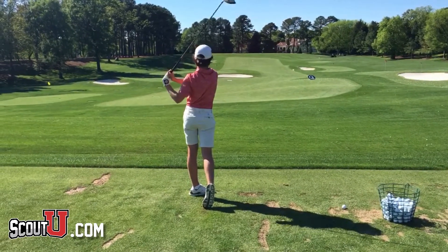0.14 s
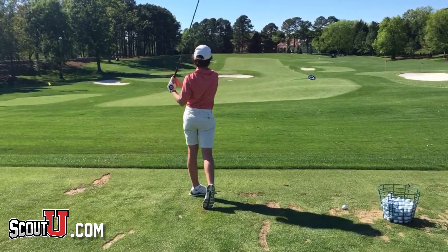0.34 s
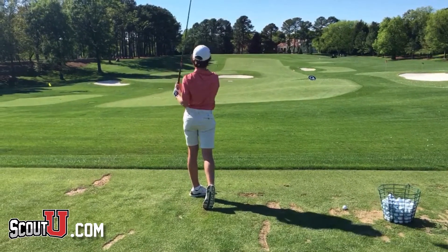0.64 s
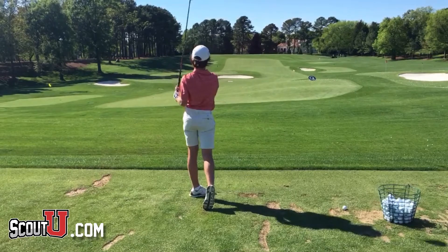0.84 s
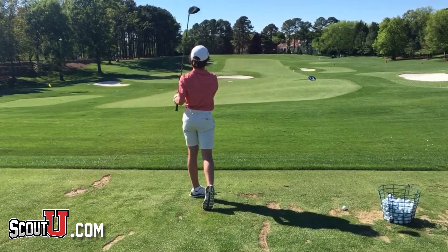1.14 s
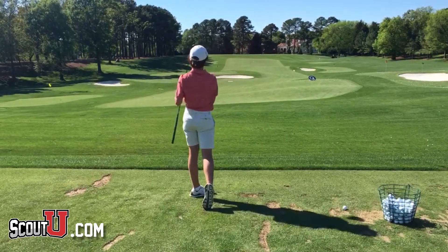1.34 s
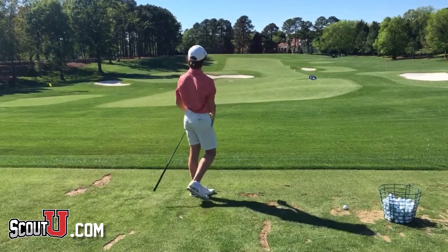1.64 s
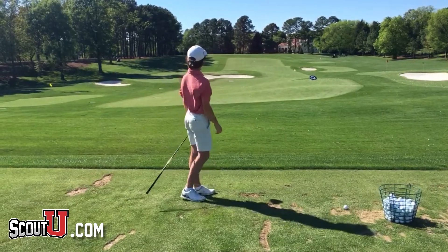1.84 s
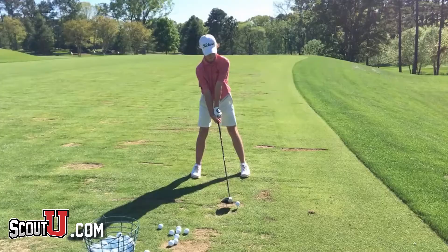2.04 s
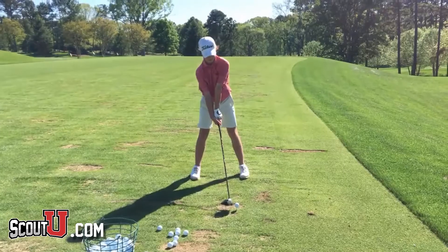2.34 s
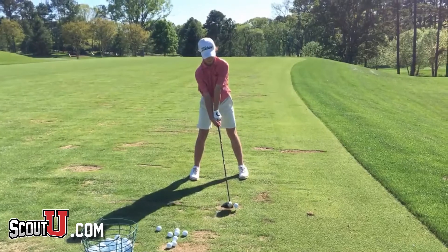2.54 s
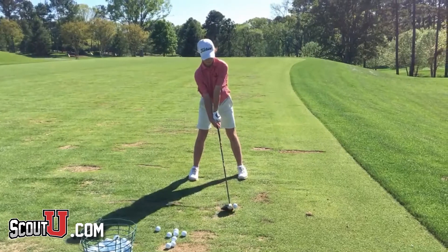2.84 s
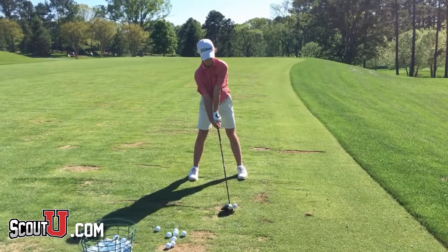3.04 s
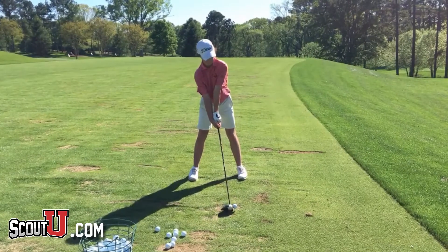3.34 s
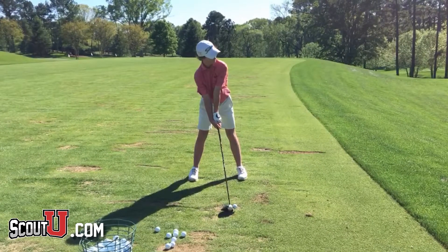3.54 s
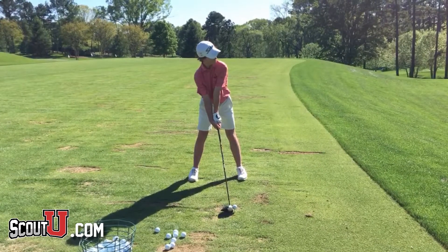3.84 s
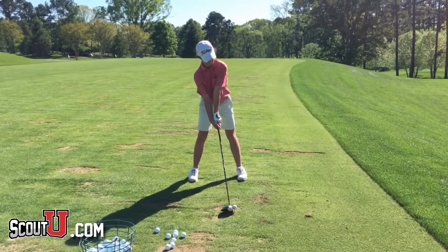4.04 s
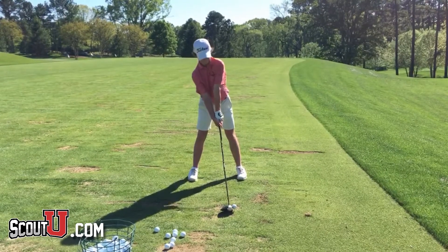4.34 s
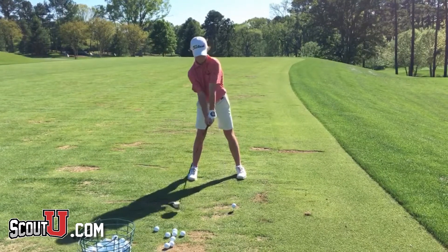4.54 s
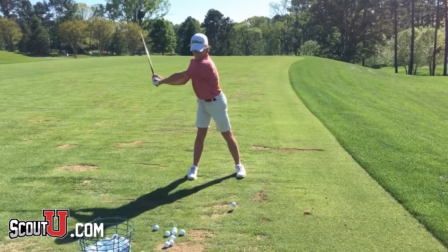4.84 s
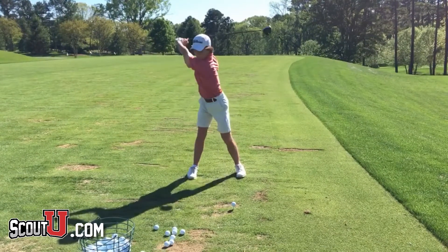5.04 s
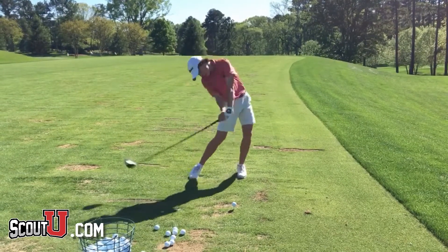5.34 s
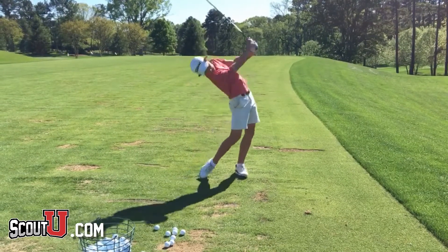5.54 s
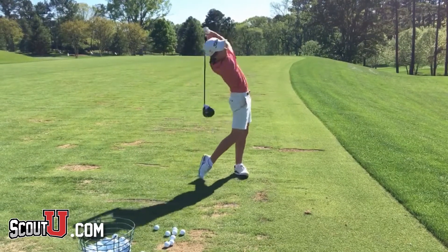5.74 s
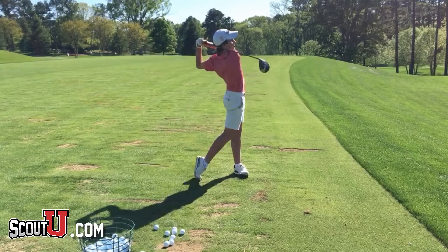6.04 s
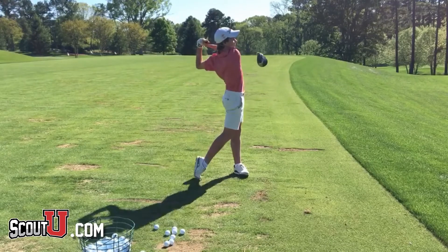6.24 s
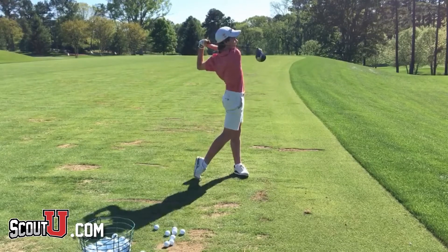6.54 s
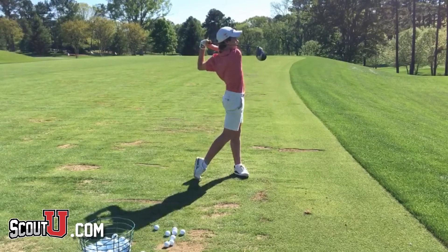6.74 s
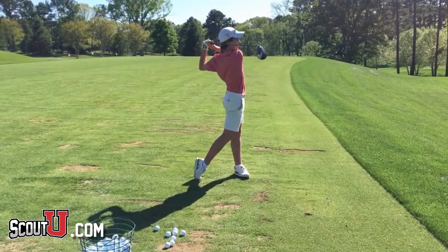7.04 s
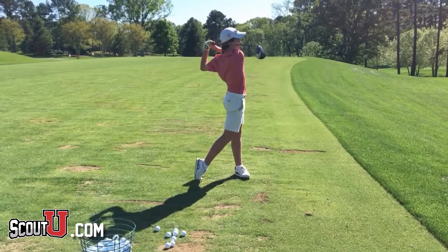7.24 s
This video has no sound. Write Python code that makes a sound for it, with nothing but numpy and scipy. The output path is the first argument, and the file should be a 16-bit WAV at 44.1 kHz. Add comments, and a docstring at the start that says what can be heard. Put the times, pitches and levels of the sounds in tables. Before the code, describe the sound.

An open-air golf practice range, heard in two views. From 0 to 2.1 seconds, a distant mower drones softly and low, swelling slightly around 1.6, with light wind and a whisper of treble rustle. Thin, faint bird whistles come between 0.25 and 1.1. Small knocks tick by, and at 0.83 another player's distant shot makes a short click, thud and tiny ring. Soft brushes and light ticks come near 2.0. A very brief silence follows at 2.1, then the mower is suddenly nearer: a fluttering low rumble with hollow roar, faint whine and hiss, and wind bumps near 2.4 and 4.4. At about 5.4 a driver swishes up rapidly, and at 5.53 it cracks the ball, loud, sharp and metallic, briefly ducking the background. Turf scatters the crack, and a weak tree-line echo swells and fades by about 6.4. Clothes rub faintly near 5.8. The mower rumbles on to the end at 7.4.

```python
"""A golf practice range in two views. First: a distant mower (blurred exhaust orders), light wind noise,
faint birds (wavering sines), and another player's shot among knocks (click, thud and ring).
After a brief silence the mower is nearer: orders, roar, whine and hiss. A driver swishes (speed-driven
vortex tones and noise) and cracks the ball: head modes ring in decaying sines, the limiter ducks,
turf scatters the crack and the tree line answers with a slow noise echo."""
import sys
import numpy as np
from scipy import signal
from scipy.fft import rfft, irfft, next_fast_len
from scipy.io import wavfile
from scipy.ndimage import uniform_filter1d, minimum_filter1d

SR = 44100
rng = np.random.default_rng(int(sys.argv[2]) if len(sys.argv) > 2 else 0)


def waveform_to_disk(signal):
    """Save audio, clipped to [-1, 1], as 16-bit WAV at the path in sys.argv[1]."""
    frames = np.transpose(np.atleast_2d(signal))
    scaled = np.clip(frames, -1, 1) * 32767
    samples = np.round(scaled).astype(np.int16)
    wavfile.write(sys.argv[1], SR, samples)


N = 325899
TIME = np.arange(N) / SR
FIRST_VIEW_END_S, SECOND_VIEW_START_S, FADE_S = 2.098, 2.1438, 0.0006
IMPACT_S = 5.5329


def from_db(db):
    """Decibels to gain."""
    return 10 ** (np.asarray(db) / 20)


def rms_one(x):
    """Scale to unit rms."""
    return x / np.sqrt(np.mean(x ** 2) + 1e-20)


def in_time(rows):
    """Interpolate each column of a time table at every sample."""
    time_s, *columns = np.transpose(rows)
    return [np.interp(TIME, time_s, column) for column in columns]


def shaped_noise(gain_at):
    """Unit-rms noise whose amplitude spectrum follows a function of frequency."""
    size = next_fast_len(N)
    hz = np.maximum(np.arange(size // 2 + 1) * SR / size, 1)
    spectrum = rfft(rng.standard_normal(size)) * gain_at(hz)
    return rms_one(irfft(spectrum, size)[:N])


def coloured(spectrum):
    """Unit-rms noise with a (Hz, dB) spectrum, falling away below its first point."""
    points_hz, points_db = np.transpose(spectrum)

    def gain_at(hz):
        """Interpolate over log frequency."""
        level_db = np.interp(np.log(hz), np.log(points_hz), points_db)
        return from_db(level_db) * np.minimum(hz / points_hz[0], 1) ** 2

    return shaped_noise(gain_at)


def drift(rate_hz, step=8):
    """Slow random signal of unit rms, low-passed at a rate on a coarse grid."""
    count = next_fast_len(N // step + 2)
    low_pass = 1 / (1 + (np.fft.rfftfreq(count, step / SR) / rate_hz) ** 2)
    slow = irfft(rfft(rng.standard_normal(count)) * low_pass, count)
    return np.interp(np.arange(N) / step, np.arange(count), rms_one(slow))


def phase_of(hz):
    """Running phase [rad] of a fixed or moving frequency."""
    return 2 * np.pi * np.cumsum(hz * np.ones(N)) / SR


def narrow_noise(phase, width_hz):
    """A tone blurred by two independent random amplitudes around a running phase."""
    return (drift(width_hz) * np.cos(phase) + drift(width_hz) * np.sin(phase)) / np.sqrt(2)


def dying(start_s, t60_s):
    """Envelope that jumps to 1 and decays by 60 dB in t60_s."""
    age_s = TIME - start_s
    return (age_s >= 0) * np.exp(-np.log(1000) * np.clip(age_s / t60_s, 0, 10))


def swell(centre_s, length_s):
    """Half-cosine rise and fall of height 1."""
    return np.cos(np.pi * np.clip((TIME - centre_s) / length_s, -0.5, 0.5))


BREEZE_DB, BREEZE_SWING_DB, BREEZE_SWING_HZ = -51, 4.5, 4.0
# gusts: (centre [s], length [s], level [dB])
GUSTS = [(0.558, 0.12, -43), (1.923, 0.29, -46), (2.406, 0.13, -28.5), (3.285, 0.31, -36.5),
         (3.634, 0.23, -41.5), (4.018, 0.34, -39), (4.415, 0.21, -28.5), (6.89, 0.33, -41)]
# wind noise colour: (frequency [Hz], relative density [dB])
WIND_COLOUR = [(22, -42), (34, -13), (45, 0), (65, -4), (110, -16), (300, -45), (1000, -90)]


def wind():
    """A light, uneven breeze and a few gusts make low noise at the microphone port."""
    breeze = from_db(BREEZE_DB + BREEZE_SWING_DB * drift(BREEZE_SWING_HZ))
    gusts = sum(from_db(db) * swell(s, length_s) ** 2 for s, length_s, db in GUSTS)
    return (breeze + gusts) * coloured(WIND_COLOUR)


RUSTLE_DB, RUSTLE_SWING_DB, RUSTLE_SWING_HZ = -83.5, 3.5, 7.0
# rustle colour: (frequency [Hz], relative density [dB])
RUSTLE_COLOUR = [(2000, -19), (3500, 0.5), (6000, 0.5), (9000, 1.5), (14000, -13)]


def rustle():
    """A faint, uneven whisper of treble noise."""
    return from_db(RUSTLE_DB + RUSTLE_SWING_DB * drift(RUSTLE_SWING_HZ)) * coloured(RUSTLE_COLOUR)


# faint far calls: (centre [s], length [s], pitch [Hz], pitch waver [Hz], level [dB])
BIRDS = [(0.252, .04, 3420, 90, -66), (0.3, .1, 3420, 60, -77), (0.57, .05, 8650, 60, -76),
         (0.66, .12, 3920, 80, -76), (0.7, .18, 2430, 110, -67), (1.01, .22, 4770, 4, -79.5)]


def birds(waver_rate_hz=140.0):
    """Short thin whistles: sines, some steady, some rough with a quick pitch waver."""
    calls = 0
    for s, length_s, hz, waver_hz, db in BIRDS:
        whistle = np.sin(phase_of(hz + waver_hz * drift(waver_rate_hz)))
        calls = calls + from_db(db) * swell(s, length_s) * whistle
    return calls


# exhaust orders from the first up, before the swell: (level [dB])
FAR_ORDERS_DB = [-49.5, -52.5, -58, -64.5]
# open air in the first view: (frequency [Hz], relative density [dB])
FAR_AIR_COLOUR = [(40, -3.5), (75, 3), (130, 4.5), (220, -0.5), (300, -7), (420, -18), (800, -17.5),
                  (1400, -18.5), (2200, -28.5), (3200, -36.5), (6000, -47), (10000, -66), (15000, -65)]
FAR_AIR_DB = -46.5
FAR_SWELL_S, FAR_SWELL_LENGTH_S, FAR_SWELL_DB = 1.58, 0.8, 6.5  # dB added to the first order


def far_mower(firing_hz=73.9, blur_hz=5.1):
    """Distance blurs the exhaust orders; one swell on the breeze lifts the lowest most."""
    lift_db = FAR_SWELL_DB * swell(FAR_SWELL_S, FAR_SWELL_LENGTH_S)
    drone = 0
    for order, db in enumerate(FAR_ORDERS_DB, start=1):
        tone = rms_one(narrow_noise(order * phase_of(firing_hz), blur_hz))
        drone = drone + from_db(db + lift_db / order) * tone
    return drone + from_db(FAR_AIR_DB) * coloured(FAR_AIR_COLOUR)


# click and brush colour: (frequency [Hz], relative density [dB])
CLICK_COLOUR = [(800, -8), (1900, -3), (2450, 9), (2900, -4), (3400, 7.5), (4100, 0), (4700, -7), (5300, 0),
                (6200, 2.5), (7100, -11), (10000, -14), (15000, -45)]
# soft brushes of shoes and clothes: (centre [s], length [s], level [dB])
BRUSHES = [(0.82, 0.08, -70), (1.94, 0.1, -67), (2.04, 0.4, -74)]


def brushes():
    """Shoes and clothes brush softly: swells of noise in the click colour."""
    level = sum(from_db(db) * swell(s, length_s) ** 2 for s, length_s, db in BRUSHES)
    return level * coloured(CLICK_COLOUR)


# other players' shots and knocks: (time [s], click level [dB], decay t60 [s],
# thud above click [dB], ring pitch [Hz], ring above click [dB])
KNOCKS = [(0.277, -65, 0.05, 0, 2180, 10), (0.555, -72, 0.07, 10, 1850, 19),
          (0.565, -73, 0.15, 12, 3500, 9), (0.7885, -66, .015, -5, 6000, 2),
          (0.809, -65, 0.012, 19, 1500, 14), (0.818, -64, .03, -5, 5400, 3),
          (0.825, -65, .035, 12, 2350, 11), (0.835, -44, 0.0039, 15, 1900, 4),
          (0.8365, -69, 0.08, 21, 380, 28), (0.84, -62, .015, 0, 8650, 6), (1.208, -66, .05, -10, 3300, -3),
          (1.32, -69.5, 0.25, 4, 3500, 2), (1.9995, -65, 0.1, -5, 5950, 3), (2.002, -64, 0.22, 4, 3330, 11),
          (2.003, -70, 0.24, 5, 2450, 16)]
# thud colour: (frequency [Hz], relative density [dB])
THUD_COLOUR = [(150, -4), (350, 1), (900, -4), (2200, -4), (3200, -14), (6000, -36), (12000, -56)]
KNOCK_RING_WIDTH_HZ = 220


def knocks(rise_s=0.00007):
    """Each distant knock is a click, a duller thud and a blurred ring under one decay."""
    click, thud, hits = coloured(CLICK_COLOUR), coloured(THUD_COLOUR), 0
    for s, db, t60_s, thud_db, ring_hz, ring_db in KNOCKS:
        ring = from_db(ring_db) * narrow_noise(phase_of(ring_hz), KNOCK_RING_WIDTH_HZ)
        envelope = np.clip((TIME - s) / rise_s, 0, 1) * dying(s, t60_s)
        hits = hits + from_db(db) * envelope * (click + from_db(thud_db) * thud + ring)
    return hits


FAR_SHOT_S = 0.8347
# distant club head modes: (frequency [Hz], level [dB], decay t60 [s])
FAR_HEAD = [(1850, -47, .018), (2450, -47, .016), (3680, -48, 0.02), (4600, -55, 0.06),
            (5200, -40.5, 0.012), (5700, -39, 0.011), (5980, -41, 0.011)]


def far_ring():
    """The distant club head rings briefly: decaying sines of alternating sign."""
    ring = 0
    for k, (hz, db, t60_s) in enumerate(FAR_HEAD):
        mode = np.sin(2 * np.pi * hz * (TIME - FAR_SHOT_S))
        ring = ring + (-1) ** k * from_db(db) * dying(FAR_SHOT_S, t60_s) * mode
    return ring


FIRING_HZ, WANDER_HZ, WANDER_RATE_HZ = 73.04, 0.614, 3.08
# uneven level of the two lowest exhaust orders, with one random pattern of fades typed in:
# (time [s], first [dB], second [dB])
DRONE_LEVEL = [(2.16, -35.5, -53), (2.23, -34, -30.5), (2.3, -27, -45.5), (2.42, -29, -38.5),
               (2.48, -36, -30), (2.62, -28, -35.5), (2.67, -28, -28), (2.74, -33.5, -36), (3.02, -35, -39),
               (3.09, -45, -48), (3.12, -34, -31.5), (3.22, -30, -47), (3.28, -32, -30),
               (3.38, -30.5, -43.5), (3.41, -45, -31.5), (3.47, -30, -34), (3.7, -35, -33.5),
               (3.98, -30, -33.5), (3.99, -33.5, -43.5), (4.08, -28.5, -30.5), (4.12, -47, -40),
               (4.19, -28.5, -34), (4.28, -39.5, -43), (4.56, -29, -31.5), (4.63, -27, -38),
               (4.72, -43, -39.5), (4.83, -33, -28), (4.94, -38, -34), (4.97, -43, -52), (4.99, -55, -33.5),
               (5.04, -34, -25), (5.12, -29.5, -37), (5.21, -47.5, -28), (5.24, -36.5, -44),
               (5.36, -38, -38.5), (5.4, -29.5, -34), (5.5, -31, -37.5), (6.06, -38, -37),
               (6.1, -32, -29.5), (6.16, -29.5, -39.5), (6.21, -33.5, -30.5), (6.35, -30.5, -38.5),
               (6.4, -29.5, -27), (6.45, -30.5, -45), (6.49, -27, -31.5), (6.71, -39, -29.5),
               (6.78, -31.5, -35), (6.9, -44, -36.5), (7.04, -33, -32.5), (7.12, -47.5, -43),
               (7.18, -27, -35), (7.22, -29.5, -40), (7.28, -33.5, -30), (7.38, -37.5, -29.5)]
# third and fourth order, before the added fading: (level [dB])
UPPER_ORDERS_DB = [-41, -50.5]
SCATTERED_SHARE, BLUR_HZ = 0.2, 4.6  # at the first order; both grow with the order
FADING_DB, FADING_RATE_HZ = 1.2, 10.0


def near_drone():
    """Exhaust orders of one wandering firing rate flutter as scattered parts beat with steady ones."""
    phase = phase_of(FIRING_HZ + WANDER_HZ * drift(WANDER_RATE_HZ))
    drone = 0
    for order, db in enumerate(in_time(DRONE_LEVEL) + list(UPPER_ORDERS_DB), start=1):
        share = np.clip(SCATTERED_SHARE * order, 0, 1)
        steady = rms_one(np.sin(order * phase + rng.uniform(0, 2 * np.pi)))
        scattered = rms_one(narrow_noise(order * phase, order * BLUR_HZ))
        tone = np.sqrt(1 - share ** 2) * steady + share * scattered
        # the breeze fades each order on its own
        drone = drone + from_db(db + FADING_DB * drift(FADING_RATE_HZ)) * tone
    return drone


# deck roar colour: (frequency [Hz], relative density [dB])
ROAR_COLOUR = [(300, -15), (450, -11.5), (620, 2.5), (760, -16), (950, -3.5), (1300, -26.5), (3000, -51.5),
               (8000, -83.5)]
ROAR_DB = -58.5
ROAR_SWELL_S, ROAR_SWELL_LENGTH_S, ROAR_SWELL_DB = 7.05, 0.6, -55


def deck_roar():
    """The mower's deck roars hollowly: steady coloured noise with one swell."""
    swelling = from_db(ROAR_SWELL_DB) * swell(ROAR_SWELL_S, ROAR_SWELL_LENGTH_S)
    return (from_db(ROAR_DB) + swelling) * coloured(ROAR_COLOUR)


# hiss level before the waver: (time [s], level [dB])
HISS_LEVEL = [(2.3, -58.5), (3.3, -58), (3.5, -56), (4.1, -59.5), (4.8, -59), (5.3, -56), (7.39, -55.5)]
# hiss colour: (frequency [Hz], relative density [dB])
HISS_COLOUR = [(1200, -17), (1900, 0), (2700, 3), (3500, -1.5), (4500, -7), (5500, -24.5), (7000, -46.5),
               (9000, -56.5)]
HISS_WAVER_DB, HISS_WAVER_RATE_HZ = 0.9, 7


def cutter_hiss():
    """The cutters hiss: coloured noise that the breeze makes waver."""
    level_db = in_time(HISS_LEVEL)[0] + HISS_WAVER_DB * drift(HISS_WAVER_RATE_HZ)
    return from_db(level_db) * coloured(HISS_COLOUR)


# cutter resonances, before the common gain: (frequency [Hz], width [Hz], level [dB])
CUTTERS = [(950, 35, -63), (1078, 15, -58.5), (2040, 25, -70), (2200, 45, -66)]
# drive harmonics, before the common gain: (multiple, level at first [dB], level at the end [dB])
WHINE = [(3, -65, -57), (4, -57.5, -65), (6, -67.5, -65), (7, -65, -66), (8, -77, -66), (9, -74, -69.5)]
WHINE_HZ, WHINE_BLUR_HZ = 403.3, 7


def whine():
    """Cutter resonances and blurred drive harmonics, whose balance shifts as the mower moves on."""
    tones = sum(from_db(db) * narrow_noise(phase_of(hz), width_hz) for hz, width_hz, db in CUTTERS)
    phase = phase_of(WHINE_HZ)
    progress = np.clip((TIME - SECOND_VIEW_START_S) / (TIME[-1] - SECOND_VIEW_START_S), 0, 1)
    for multiple, first_db, last_db in WHINE:
        level = from_db(first_db + (last_db - first_db) * progress)
        tones = tones + level * narrow_noise(multiple * phase, WHINE_BLUR_HZ)
    return tones


# open air in the second view: (frequency [Hz], relative density [dB])
NEAR_AIR_COLOUR = [(40, -5), (70, 1.5), (115, 1), (230, 0), (300, -14), (400, -18), (750, -20), (1200, -18),
                   (1800, -23.5), (2600, -30.5), (4400, -49), (5500, -49), (8000, -81), (15000, -84.5)]
NEAR_AIR_DB = -39  # before the common gain
# common gain of whine and air: (time [s], level [dB])
WHINE_AIR_GAIN = [(2.3, 1.5), (3.4, 1.06), (5.3, 0), (6.0, 1), (6.35, -0.5), (7.39, 0)]


def near_mower():
    """Drone, deck roar and cutter hiss, with whine and open air under one moving gain."""
    air = from_db(NEAR_AIR_DB) * coloured(NEAR_AIR_COLOUR)
    whine_and_air = from_db(in_time(WHINE_AIR_GAIN)[0]) * (whine() + air)
    return near_drone() + deck_roar() + cutter_hiss() + whine_and_air


# crack scattered by turf and nearby things: (frequency [Hz], relative density [dB])
SCATTER_COLOUR = [(400, -2.5), (1400, -3), (2600, -8), (3500, -3), (4200, 5), (5200, -1), (7500, -1.5),
                  (8600, -8.5), (12500, -11), (15500, -12.5)]


def turf_scatter(level_db=-24, delay_s=0.0052, t60_s=0.12, side_db=-8):
    """Turf scatters the crack almost at once: decaying noise, partly different on each side."""
    mid, side = coloured(SCATTER_COLOUR), from_db(side_db) * coloured(SCATTER_COLOUR)
    envelope = from_db(level_db) * dying(IMPACT_S + delay_s, t60_s)
    return envelope * np.array([mid + side, mid - side])


# tree echo colour: (frequency [Hz], relative density [dB])
ECHO_COLOUR = [(500, -14), (1300, -0.5), (2200, -11), (4300, -13.5), (6000, -20), (9000, -40),
               (14000, -54.5)]
ECHO_DELAY_S, ECHO_RISE_S, ECHO_T60_S, ECHO_DB = 0.15, 0.17, 0.8, -47


def tree_echo():
    """The tree line answers, clump by clump: noise with a slow rise, a decay and an uneven level."""
    clumps_db = 2.5 * drift(25)
    arrival_s = IMPACT_S + ECHO_DELAY_S
    envelope = np.clip((TIME - arrival_s) / ECHO_RISE_S, 0, 1) * dying(arrival_s, ECHO_T60_S)
    return from_db(ECHO_DB + clumps_db) * envelope * coloured(ECHO_COLOUR)


# clothing rubs, before the crease swing: (centre [s], length [s], level [dB])
RUBS = [(5.33, .12, -73), (5.715, .05, -69), (5.76, .04, -69), (5.82, .1, -62.5), (5.92, .09, -68)]
# cloth colour: (frequency [Hz], relative density [dB])
CLOTH_COLOUR = [(2000, 0), (4000, 0), (6000, -4), (8500, -11), (13000, -20), (15500, -38)]
CREASE_DB, CREASE_RATE_HZ = 4, 35


def clothes():
    """The golfer's clothes rub in short noise bursts, made uneven by creases."""
    rubbing = sum(from_db(db) * swell(s, length_s) for s, length_s, db in RUBS)
    return rubbing * from_db(CREASE_DB * drift(CREASE_RATE_HZ)) * coloured(CLOTH_COLOUR)


# near reflections relative to the direct sound: (delay [s], level [dB])
REFLECTIONS = [(0.0169, -38.5), (0.0265, -30), (.036, -37.5)]


def reflected(x, diffuse_db=-33, diffuse_delay_s=0.017, diffuse_t60_s=0.085):
    """Direct sound, a few reflections, and a dense weak spray from the uneven ground."""
    age_s = TIME[:SR // 4] - diffuse_delay_s
    decay = from_db(-60 * np.abs(age_s) / diffuse_t60_s)
    spray = rng.standard_normal(len(age_s)) * (age_s > 0) * decay
    diffuse = signal.fftconvolve(x, spray / np.linalg.norm(spray))[:N]
    heard = x + from_db(diffuse_db) * diffuse
    for delay_s, db in REFLECTIONS:
        heard = heard + from_db(db) * np.interp(TIME - round(delay_s * SR) / SR, TIME, x)
    return heard


def width(x, side_db, above_hz=500):
    """The close club reaches two ports slightly out of phase: opposed quadrature, less in the bass."""
    size = next_fast_len(N)
    treble = np.minimum(np.fft.rfftfreq(size, 1 / SR) / above_hz, 1)
    quadrature = irfft(1j * rfft(x, size) * treble, size)[:N]
    return x + from_db(side_db) * quadrature * np.array([[1], [-1]])


SPEED_UP_S, SPEED_KEPT, SLOW_DOWN_S = 0.075, 0.7, 0.18  # club speed before, at and after the ball
BEAM_S, BEAM_AFTER_S = 0.076, 0.135  # half-amplitude times around impact
AIR_HISS_DB, AIR_HISS_POWER = -39.5, 7.91  # level at full speed and beam, power of the speed
# air hiss colour: (frequency [Hz], relative density [dB])
AIR_HISS_COLOUR = [(600, -8), (1500, 8.5), (2800, 3), (4500, 10), (7500, 5.5), (12000, 5), (15500, -11.5)]
WAKE_DB, WAKE_POWER = -45, 2.8  # level at full speed and beam, power of the speed
# turbulent wake colour: (frequency [Hz], relative density [dB])
WAKE_COLOUR = [(500, -3), (900, 0), (1700, 0), (3000, -7), (5000, -16), (9000, -26), (14000, -45)]
# vortices of shaft, their overtones, and head wake: (pitch at full speed [Hz], pitch power of speed,
# pitch jitter [Hz], sine gain at full speed [dB], level power of speed)
VORTICES = [(990, 1, 35, -34, 1.6), (1500, 1, 80, -46, 3), (1980, 1, 90, -44, 3), (580, .4, 80, -36, 2.4)]


def swish():
    """Shed vortices whistle roughly in hissing air; pitch and level follow powers of the club speed."""
    before_s, after_s = np.maximum(IMPACT_S - TIME, 0), np.maximum(TIME - IMPACT_S, 0)
    gathering = 1 / (1 + (before_s / SPEED_UP_S) ** 2)
    slowing = SPEED_KEPT * np.exp(-after_s / SLOW_DOWN_S)
    speed = np.where(TIME < IMPACT_S, gathering, slowing)
    # the whoosh is beamed at the microphone around the bottom of the arc
    beam = 1 / (1 + (before_s / BEAM_S + after_s / BEAM_AFTER_S) ** 8)
    air_hiss = from_db(AIR_HISS_DB) * speed ** AIR_HISS_POWER * coloured(AIR_HISS_COLOUR)
    wake = from_db(WAKE_DB) * speed ** WAKE_POWER * coloured(WAKE_COLOUR)
    whoosh = air_hiss + wake
    for hz, pitch_power, jitter_hz, db, level_power in VORTICES:
        phase = phase_of(hz * speed ** pitch_power + jitter_hz * drift(150))
        whistle = np.sin(phase) + 0.7 * narrow_noise(phase, 4 * jitter_hz)
        whoosh = whoosh + from_db(db) * speed ** level_power * whistle
    return beam * whoosh


# sole on tee and turf: (frequency [Hz], relative density [dB])
SOLE_COLOUR = [(350, -6), (550, -2.5), (1000, -13.5), (1400, 6), (2200, -27), (5000, -9)]


def tee(level_db=-12, start_s=5.5388, t60_s=0.02):
    """Just after the ball, the sole knocks tee and turf: a short noise burst."""
    return from_db(level_db) * dying(start_s, t60_s) * coloured(SOLE_COLOUR)


# modes of ball, face and hollow crown; close pairs beat: (frequency [Hz], relative level [dB], t60 [s])
HEAD = [(1305, -0.5, .018), (1490, -1, .02), (1780, -2, .013), (1950, 0, .014), (2150, -27, .19),
        (2180, -27, .13), (3240, -19, .06), (3505, -38, .14), (3548, -2, .028), (3850, -14, .03),
        (4062, -13.5, .095), (4140, -2, .032), (4310, -10, .025), (4440, -8, .03), (4538, 5, .03),
        (4400, -23, .07), (4565, -19, .09), (4790, -13, .05), (5025, -18, .085), (5230, -13, .04),
        (5490, -8, .03), (5620, -18, .06), (5880, -15, .07), (5870, -5, .025), (5975, -5, .028),
        (6135, -10, .025), (6460, -22, .07), (6660, -11, .025), (6842, 1.5, .028), (7147, -3, .028),
        (7285, -25, .11), (7553, -2, .032), (7790, -13, .043), (8460, -13, .032), (8680, -13, .025),
        (9750, -18, .026), (11150, -18, .026), (11540, -19, .026), (12150, -17, .028), (12750, -18, .028),
        (14150, -20, .026), (14800, -24, .024)]
SHELL_HZ, SHELL_BUILD_S, SHELL_SPREAD_S = 2500, 0.0008, 0.0007
DOPPLER_DROP, DOPPLER_S = 0.035, 0.04  # final pitch drop as a share; time to half of it
FLUTTER_DB, FLUTTER_RATE_HZ = 4, 70  # flutter grows in as the head turns


def head_ring(head_db=-5.0):
    """Low modes start together, shell modes build up one by one; all sag and flutter as the head turns."""
    start = round(IMPACT_S * SR)
    age_s, ring = TIME[:SR // 2], np.zeros(N)
    turned = age_s ** 2 / (age_s ** 2 + DOPPLER_S ** 2)
    lost_s = np.cumsum(DOPPLER_DROP * turned) / SR
    lags_s = rng.uniform(0, SHELL_SPREAD_S, len(HEAD))
    for (hz, db, t60_s), lag_s in zip(HEAD, lags_s):
        in_shell = hz > SHELL_HZ
        since_s = np.maximum(age_s - lag_s * in_shell, 0)
        build = 1 - np.exp(-since_s / SHELL_BUILD_S) * in_shell
        flutter_db = FLUTTER_DB * np.sqrt(turned) * drift(FLUTTER_RATE_HZ)[:len(age_s)]
        envelope = from_db(db + head_db + flutter_db) * build * np.exp(-np.log(1000) * since_s / t60_s)
        ring[start:start + len(age_s)] += envelope * np.sin(2 * np.pi * hz * (since_s - lost_s))
    return ring


# broad crack of the contact: (frequency [Hz], relative density [dB])
CRACK_COLOUR = [(300, -25.5), (600, -21), (1500, 10), (2600, -6.5), (4200, 14), (7500, 8), (9000, 3),
                (12500, 5.5), (15500, -8)]
SNAP_DB, SNAP_T60_S = -5, 0.005  # before the radiation high-pass
RADIATION_HZ = 905


def drive(crack_db=-12, crack_t60_s=0.048):
    """Ball contact snaps, cracks and rings the head, which is too small to radiate the bass."""
    crack = from_db(crack_db) * dying(IMPACT_S, crack_t60_s)
    snap = from_db(SNAP_DB) * dying(IMPACT_S, SNAP_T60_S)
    blow = head_ring() + (crack + snap) * coloured(CRACK_COLOUR)
    radiation = signal.butter(3, RADIATION_HZ, "high", fs=SR, output="sos")
    return signal.sosfilt(radiation, blow + 1e-18)


def scene():
    """Two views joined by a brief silence; everything far away is mono."""
    breeze = wind()
    first = breeze + rustle() + birds() + far_mower() + brushes() + knocks() + far_ring()
    club = width(swish(), side_db=-23.0) + width(reflected(drive() + tee()), side_db=-24.0)
    second = breeze + near_mower() + turf_scatter() + tree_echo() + clothes() + club
    fade_out = np.clip((FIRST_VIEW_END_S - TIME) / FADE_S, 0, 1)
    fade_in = np.clip((TIME - SECOND_VIEW_START_S) / FADE_S, 0, 1)
    return first * fade_out + second * fade_in


def limiter(x, ceiling_db=-12, held_db=2.5, hold_s=0.2):
    """Press loud moments down to an rms ceiling; hold a few dB of that reduction for a while."""
    power = uniform_filter1d(np.mean(x ** 2, axis=0), size=66)
    level_db = 10 * np.log10(np.maximum(power, 1e-12))
    gain_db = np.minimum(ceiling_db - level_db, 0)
    hold = int(hold_s * SR) // 2
    held = minimum_filter1d(np.maximum(gain_db, -held_db), 2 * hold + 1, origin=hold)
    return x * from_db(uniform_filter1d(np.minimum(gain_db, held), size=22))


def record(dry, low_cut_hz=19.0, high_cut_hz=15400):
    """The microphone drops the deepest bass; then limiter, rounded peaks and a steep top cut."""
    low_cut = signal.butter(4, low_cut_hz, "high", fs=SR, output="sos")
    heard = signal.sosfilt(low_cut, dry)
    rounded = 1.5 * np.tanh(limiter(heard) / 1.5)
    high_cut = signal.ellip(10, 0.1, 80, high_cut_hz, fs=SR, output="sos")
    return signal.sosfilt(high_cut, rounded)


dry = scene()
out = record(dry)
waveform_to_disk(out)
```